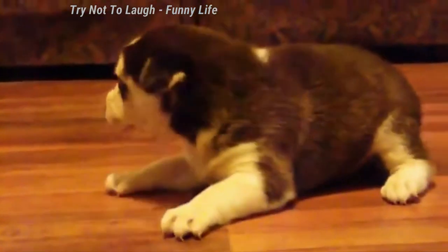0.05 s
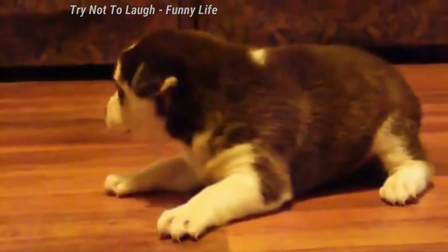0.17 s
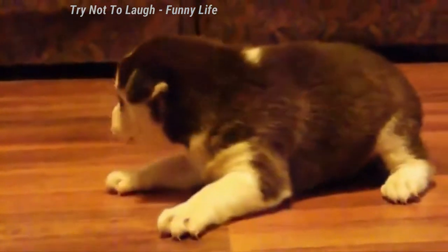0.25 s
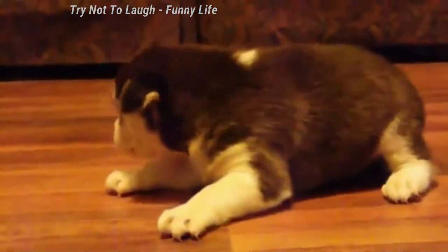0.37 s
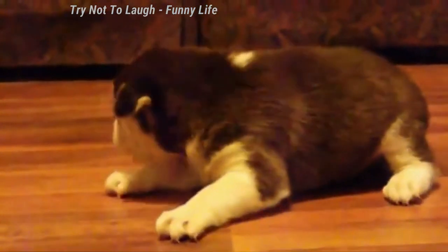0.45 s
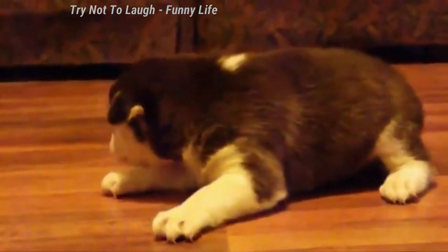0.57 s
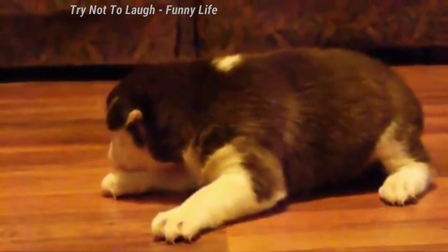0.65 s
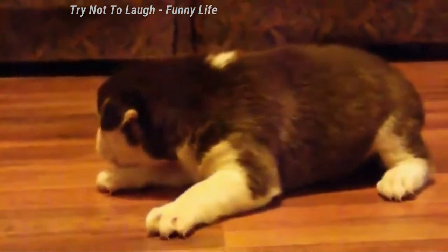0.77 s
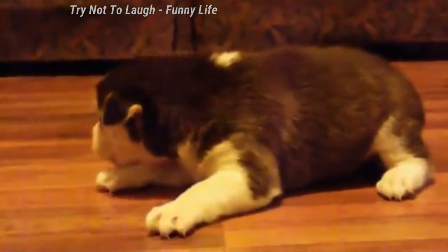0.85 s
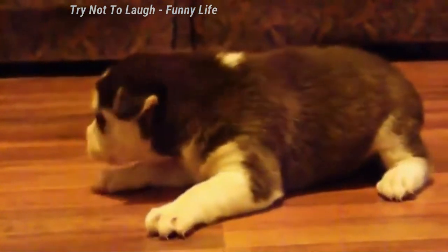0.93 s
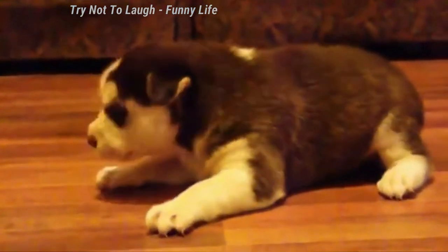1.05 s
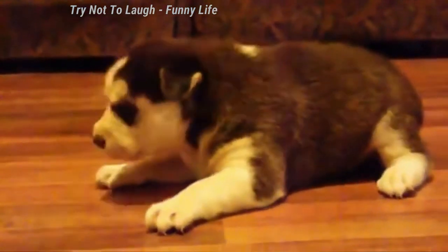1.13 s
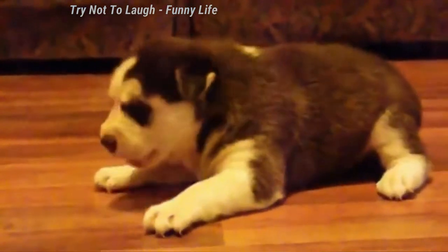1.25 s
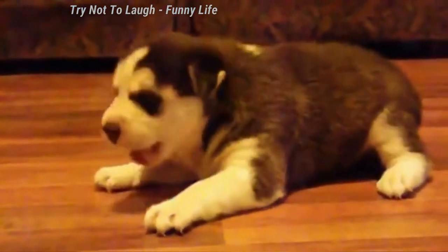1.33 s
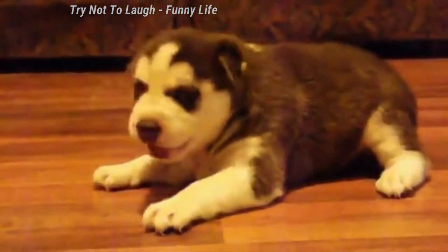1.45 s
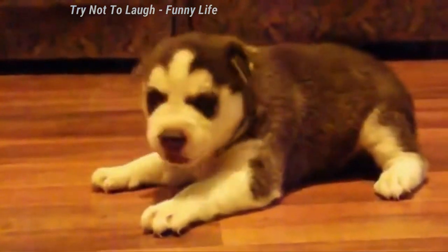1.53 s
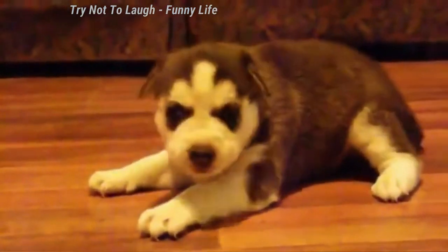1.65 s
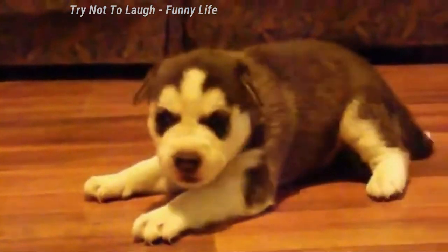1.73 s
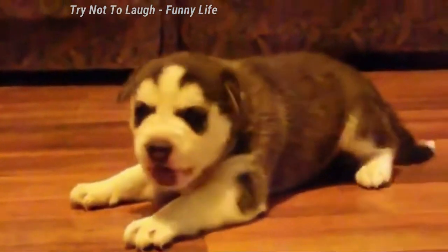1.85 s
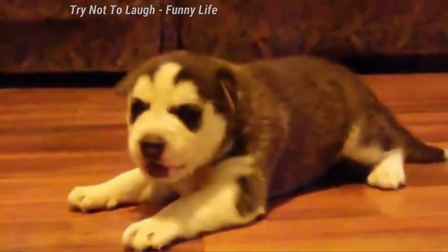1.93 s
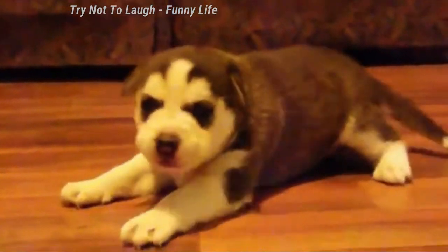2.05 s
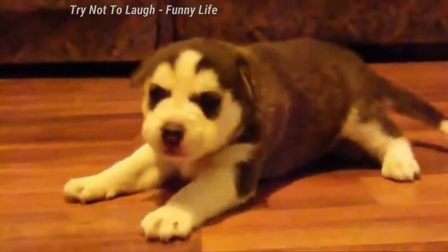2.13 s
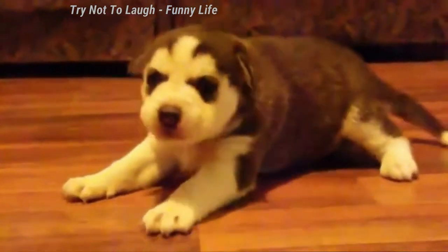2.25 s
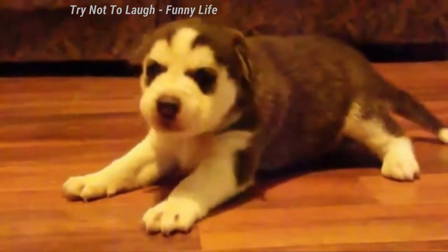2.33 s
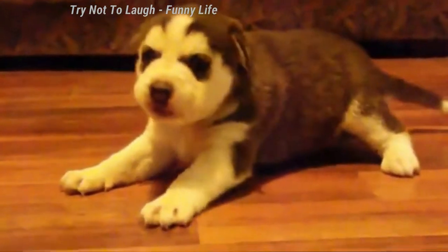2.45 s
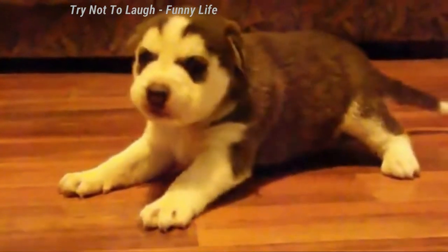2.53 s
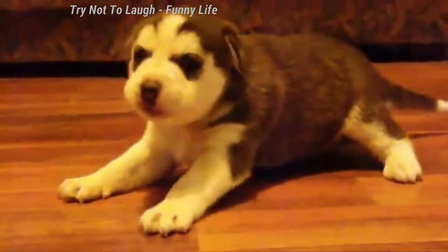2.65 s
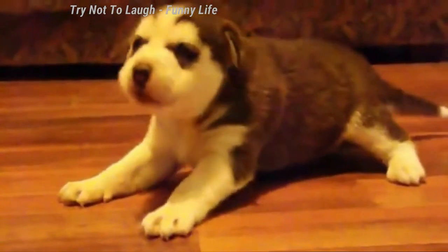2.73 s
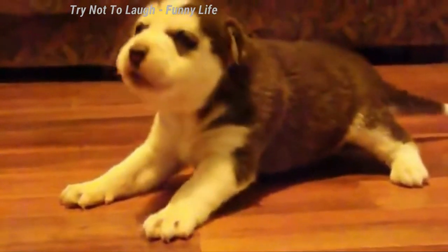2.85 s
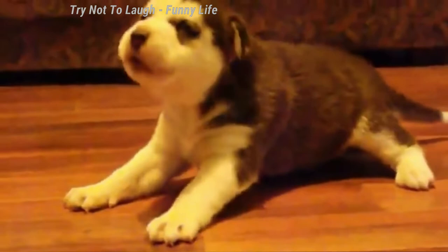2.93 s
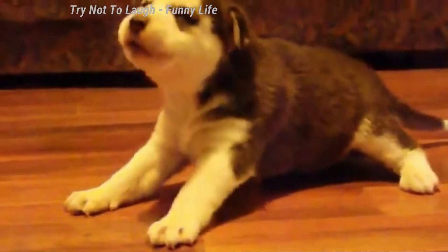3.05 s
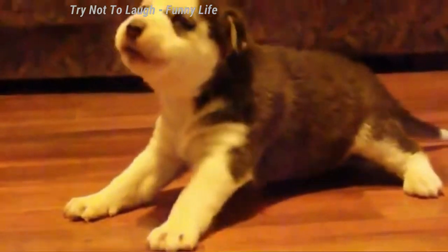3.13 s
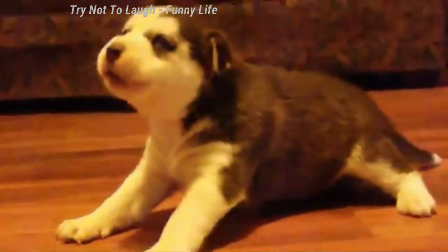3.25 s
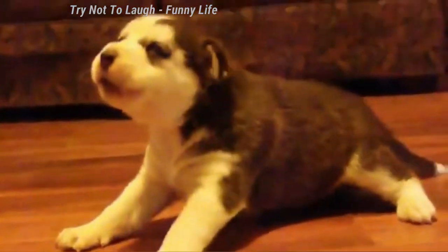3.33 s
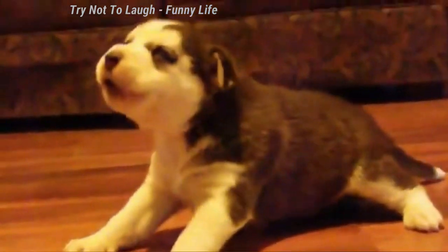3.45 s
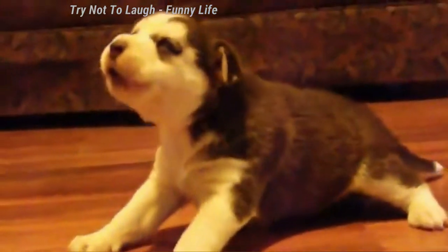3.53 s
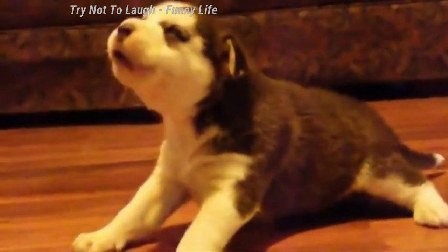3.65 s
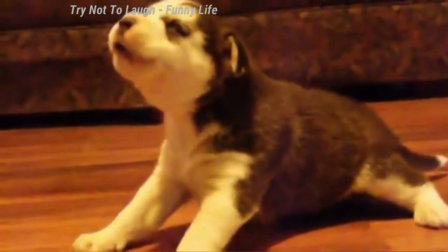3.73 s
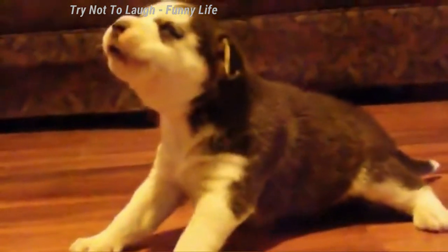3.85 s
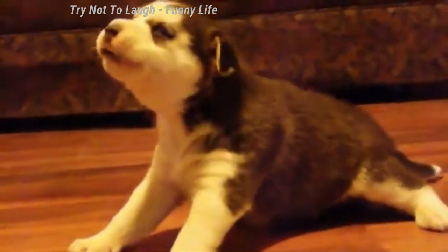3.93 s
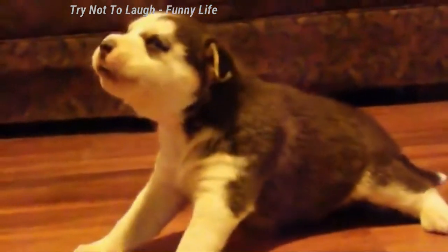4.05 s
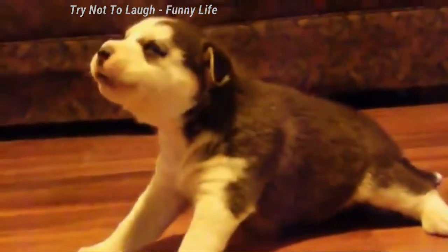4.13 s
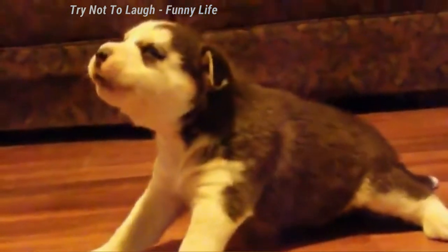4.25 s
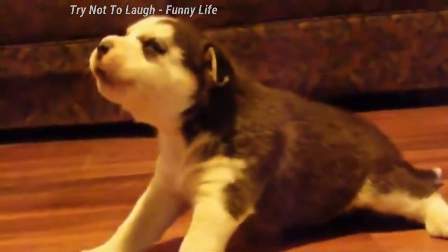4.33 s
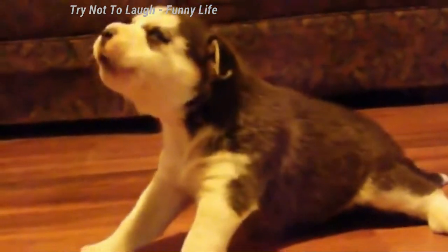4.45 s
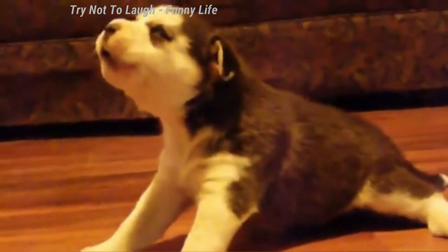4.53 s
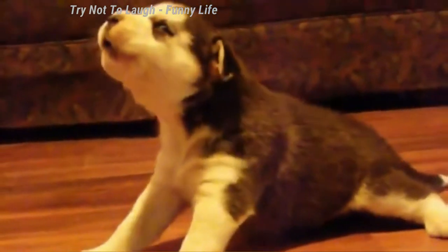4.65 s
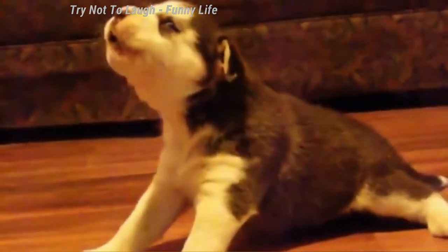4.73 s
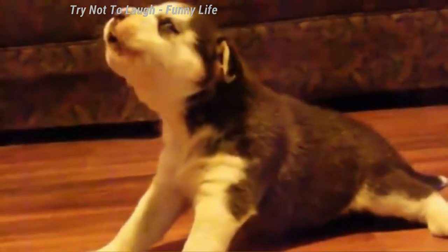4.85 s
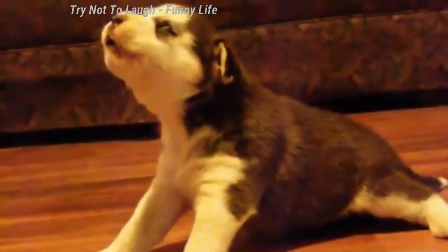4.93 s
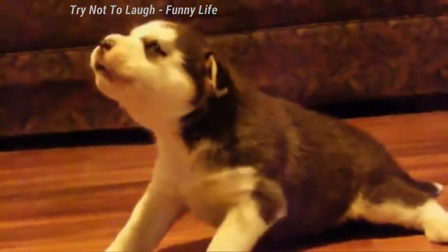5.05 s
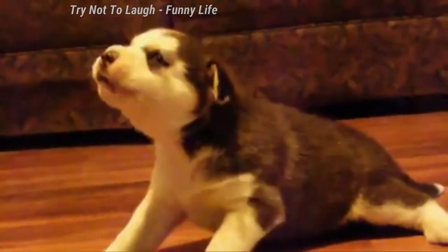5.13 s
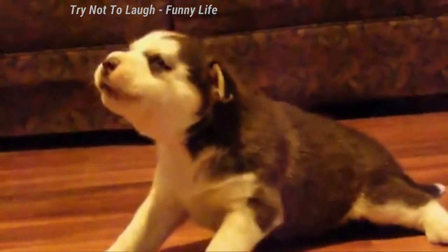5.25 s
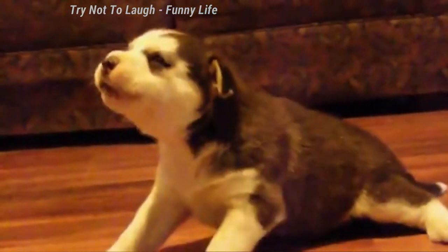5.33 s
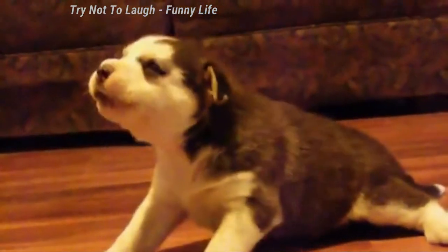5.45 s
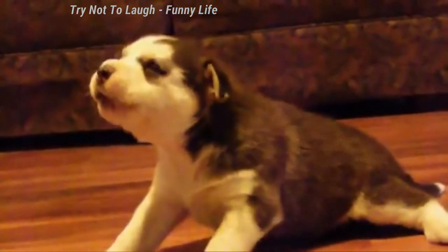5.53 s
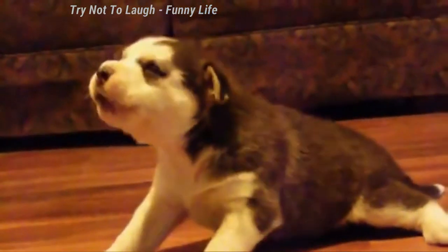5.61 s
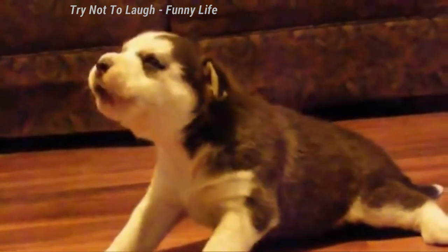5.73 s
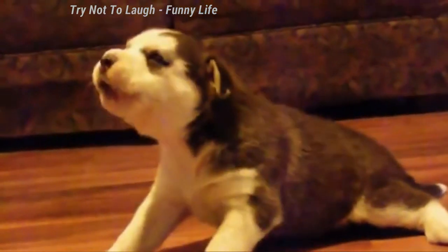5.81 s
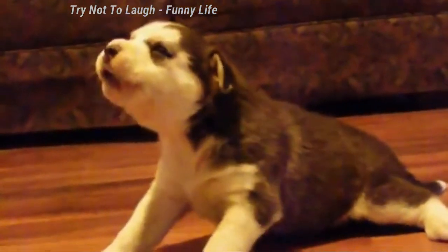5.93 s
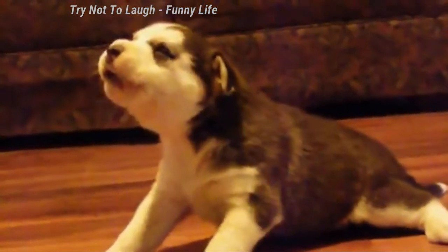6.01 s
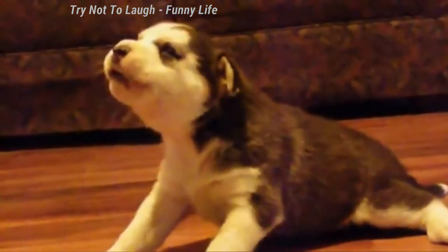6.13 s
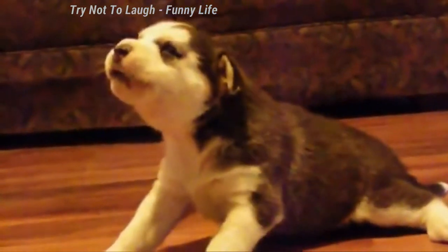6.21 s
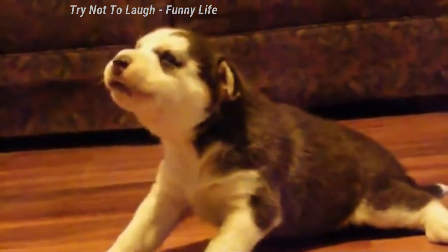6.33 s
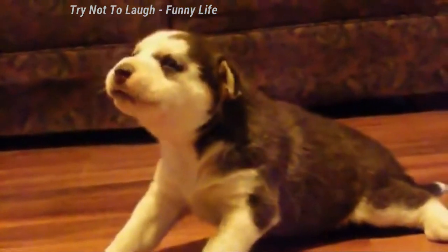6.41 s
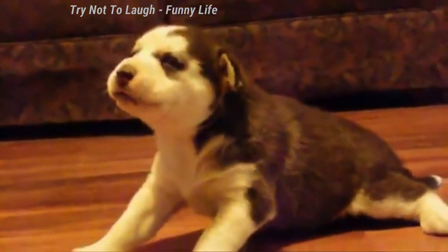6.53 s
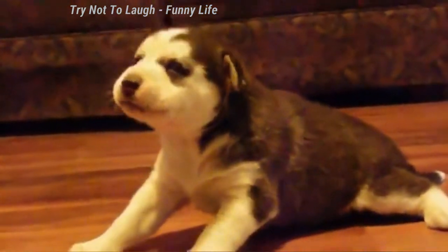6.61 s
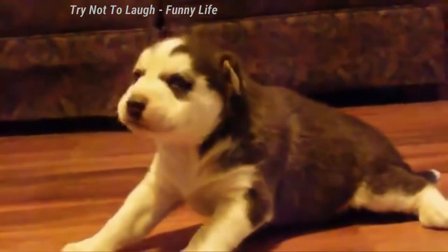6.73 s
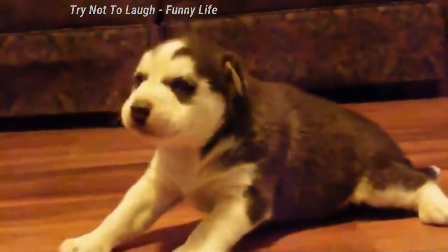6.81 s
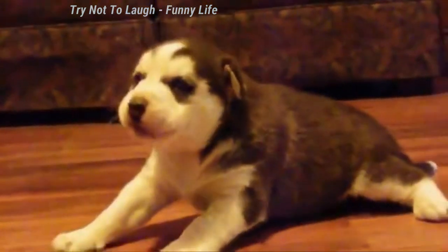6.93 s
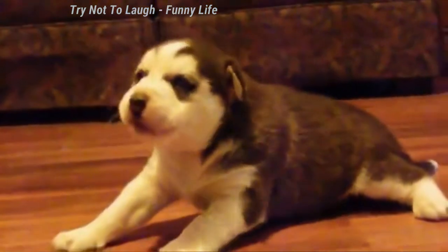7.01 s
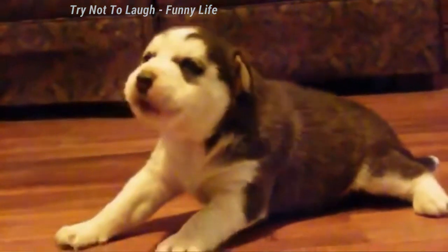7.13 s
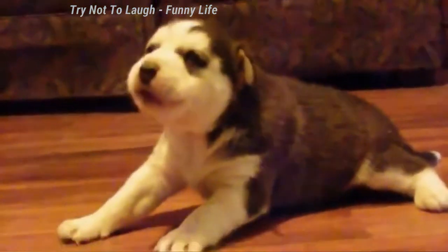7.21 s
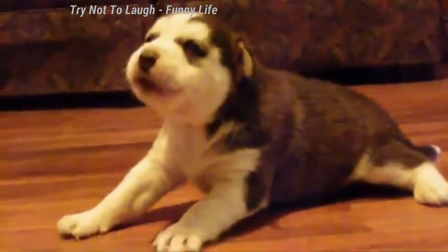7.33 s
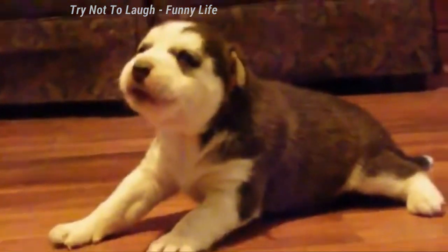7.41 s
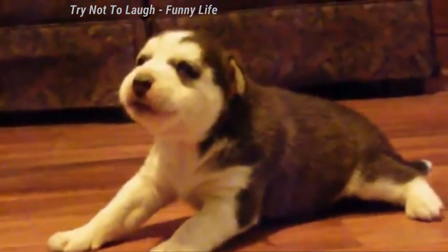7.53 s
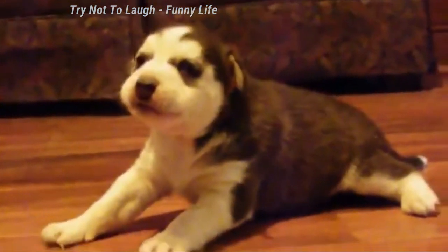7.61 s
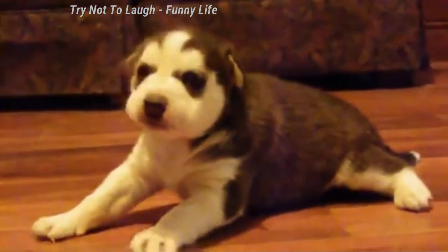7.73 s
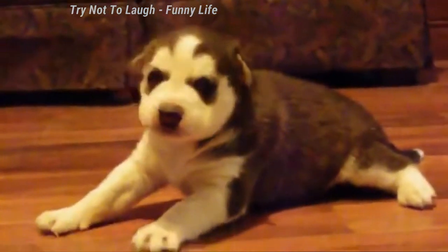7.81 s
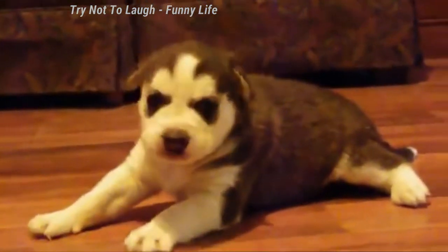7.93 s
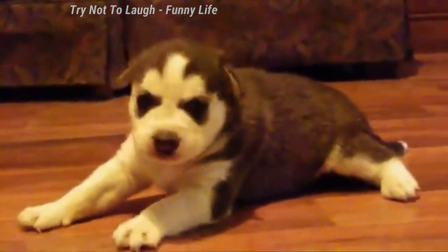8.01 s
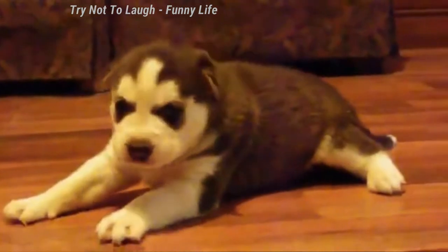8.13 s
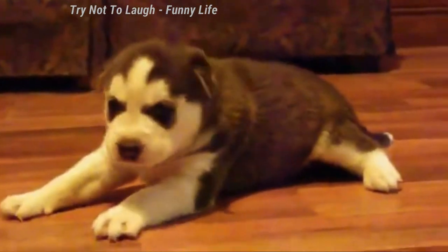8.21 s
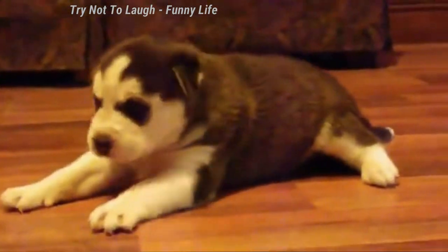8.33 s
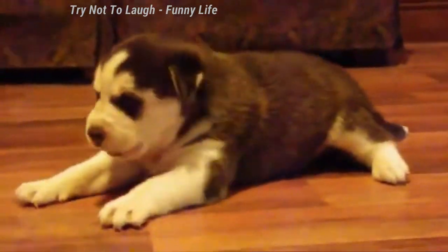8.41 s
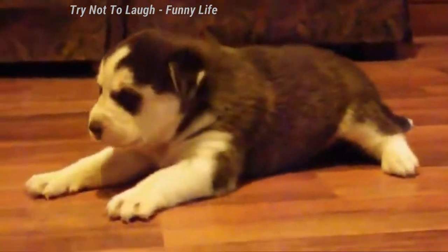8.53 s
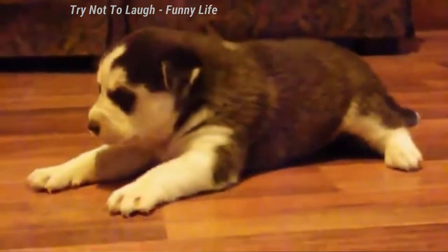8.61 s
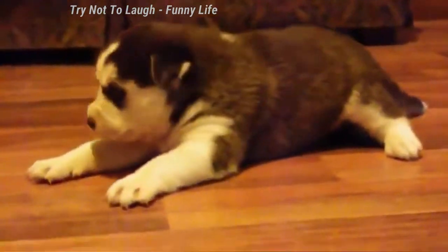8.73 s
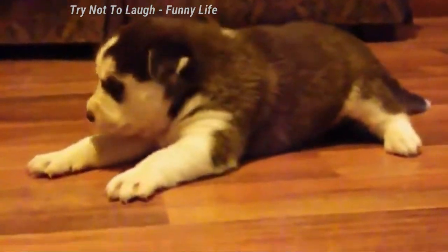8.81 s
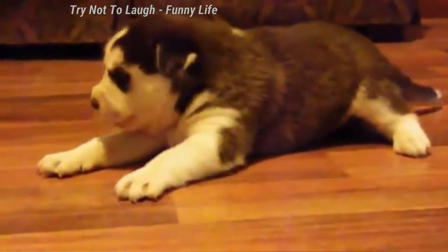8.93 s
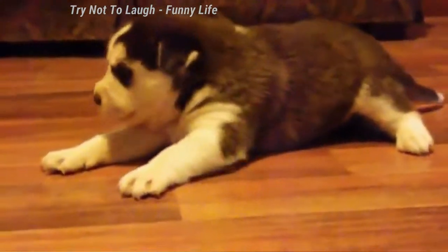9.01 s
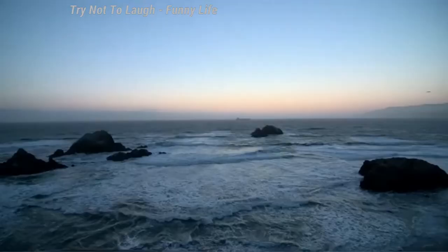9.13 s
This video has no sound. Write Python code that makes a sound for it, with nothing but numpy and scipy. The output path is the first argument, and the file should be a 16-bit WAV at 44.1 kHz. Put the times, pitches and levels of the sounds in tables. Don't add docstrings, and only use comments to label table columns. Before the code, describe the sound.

High-pitched puppy yips leap into wails and thin sustained howls with croaky starts and gasps, ending in short yips, indoors over soft hiss.

```python
import sys
import numpy as np
from scipy import signal
from scipy.fft import rfft, irfft, next_fast_len
from scipy.io import wavfile
from scipy.ndimage import uniform_filter1d, map_coordinates

SR = 44100
rng = np.random.default_rng(int(sys.argv[2]) if len(sys.argv) > 2 else 0)


def output_pcm(signal):
    pcm = np.clip(np.atleast_2d(signal).T, -1, 1) * 32767
    wavfile.write(sys.argv[1], SR, np.round(pcm).astype(np.int16))


def natural_amplitude(level_db):
    exponent = np.asarray(level_db, float) / 20
    return 10 ** exponent


N = 403955
END_S = 9.128

# frequency [Hz], level [dB].
HUM_TONES = [(120.1, -59), (180.2, -66), (240.2, -59), (300.3, -60), (473, -59)]
# frequency [Hz], density [dB per Hz].
HISS_SPECTRUM = [(18, -55), (40, -28), (100, -12.5), (270, -7.5), (470, -10.5), (1020, -8), (1510, -12.5),
                 (2070, -9), (2760, -13.5), (4660, -13.5), (11900, -26), (15500, -39)]
HISS_DB = -44
# frequency [Hz], time to fall by 60 dB [s].
ROOM_DECAY = [(400, 0.12), (750, 0.4), (1300, 0.41), (3500, 0.38), (8000, 0.29), (15000, 0.17)]
ROOM_DB = -7

# time [s], pitch [Hz], effort [dB], mouth opening [0-1],
# fold pressure on the overtones [dB].
YIP_CURVES = [
    [(0.0, 1268, -37, 0.72, -4), (.04, 1030, -36, 0.24, 7.5), (.07, 879.6, -29, 0, -1),
     (.178, 839, -21.5, 0.04, -7)],
    [(.42, 1072, -27.5, 0.98, -18), (.454, 1250, -18.5, 0.62, -13), (.47, 1413, -22, 0.56, 1.5),
     (.49, 1674, -17.5, 0.6, -10), (.516, 1655, -14, 1, -22.5), (.55, 1132, -28.5, 0.56, -1),
     (.567, 1015, -33, 0.2, 6)],
    [(.78, 1070, -26, 0.85, -19), (.818, 1218, -21.5, 0.49, -1.5), (.852, 1622, -28, 0.98, 11),
     (.9, 1610, -23, 1, -21), (.914, 1513, -21.5, 0.8, -13), (.93, 1235, -20.5, 0.6, -10),
     (.947, 1070, -25.5, 0.37, -5), (1.009, 1026, -26.5, 0.5, -9), (1.085, 998.4, -27, 0.13, -6)],
    [(1.305, 967, -26.5, 0.42, -2), (1.346, 1160, -19, 0.98, -1.5), (1.364, 1308, -22, 0.75, -2),
     (1.378, 1547, -23.5, 0.7, -4), (1.415, 1701, -21.5, 1.13, -12), (1.468, 1432, -26, 1.1, -7),
     (1.498, 1103, -32, 0.55, 2.5), (1.6, 1056, -27, 0.55, -1), (1.618, 998, -31.5, 0, 6.5)],
]
WAIL_CURVES = [
    [(1.814, 880, -24, 0.28, 2.5), (1.842, 1061, -23.5, 0.93, 5.5), (1.866, 1230, -22.5, 0.86, -9.5),
     (1.938, 1925, -24, 0.91, -5), (1.963, 1965, -23, 1, -9), (2.008, 1460, -24, 1.2, -18),
     (2.057, 1271, -23, .5, -18.5), (2.117, 1250, -24.5, 0.37, 3.5), (2.182, 1213, -29, 0.54, -16.5)],
    [(2.372, 870, -30.5, 0.092, -5.5), (2.408, 982, -24.5, 0.078, 4), (2.45, 1202, -24, 0.74, -7.5),
     (2.482, 1205, -24, 0.54, -5), (2.52, 1120, -31, 0.57, -5.5), (2.75, 1035, -32.5, 0.33, -8),
     (2.918, 1069, -24.5, 0.91, -24.5), (2.97, 1033, -29, 0.63, -11), (2.99, 974, -27, 0.15, -5)],
]
HOWL_CURVES = [
    [(3.183, 765, -27, .1, -26), (3.241, 887, -22, 0.094, -19.5), (3.315, 934, -31.5, 0.092, -13),
     (3.4, 949, -24.5, 0.3, -6), (3.47, 991.3, -22.5, 0.23, 0.5), (3.62, 1011, -25, 0.42, -3.5),
     (3.769, 1012, -24.5, 0.33, 0.5), (3.861, 918, -24.5, 0.06, -1)],
    [(4.47, 932, -24, 0.09, 5), (4.56, 1006, -26, 0.11, 4), (4.686, 1044, -26.5, 0.17, 6),
     (4.8, 1030, -24, 0.26, 1.5), (4.926, 1016, -21, 0.33, -5), (5.025, 956, -24.5, 0.35, -5)],
    [(5.66, 791, -13.5, 0, -10.5), (5.688, 988, -27.5, 0.15, 6.5), (5.73, 963, -26, 0.28, 1),
     (5.812, 984.4, -25.5, 0.37, 3), (5.987, 997, -24.5, 0.28, 5.5), (6.155, 962, -26, 0.53, 3),
     (6.249, 892, -23, 0.3, -2.5), (6.3, 782, -19, 0.2, -16.5)],
]
LAST_CURVES = [
    [(7.045, 1016, -41, .15, 6), (7.111, 966, -25.5, .15, -0.5), (7.167, 996.4, -32.5, 0.24, 6),
     (7.3, 988.5, -28.5, 0.32, 8), (7.403, 977.6, -27, 0.39, 2), (7.51, 941.3, -26, 0.34, 1.5),
     (7.591, 900, -28, 0.35, 0.5), (7.67, 786, -32, 0.047, -10.5)],
    [(7.97, 821, -22, .1, -18), (7.988, 850, -24.5, 0.16, -6), (8.012, 979, -28, 0.28, 4),
     (8.045, 1049, -35, 0.79, 3.5), (8.129, 879, -26.5, 0.085, -9.5), (8.172, 804, -21.5, 0.031, -22)],
    [(8.393, 902, -26.5, 0.31, -8), (8.431, 1140, -21, 0.84, -5.5), (8.449, 1208, -18, 0.54, -11.5),
     (8.464, 1367, -20, 0.71, -18), (8.488, 1415, -20, 1, -20), (8.51, 1380, -21.5, 0.97, -18),
     (8.553, 1094, -29.5, 0.28, -15), (8.6, 1035, -36, .1, -10), (8.659, 1011, -32, 0.12, -8.5)],
    [(8.9, 944, -27, 0.46, -9), (8.927, 1072, -21.5, 0.79, -12.5), (8.942, 1161, -17.5, 1, -5.5),
     (8.972, 1383, -18.5, 0.52, -11), (9.0, 1420, -22, 1, -19), (9.03, 1306, -28, 0.96, -9),
     (9.068, 1090, -34, 0.26, -10), (9.102, 1030, -39, 0.09, -10)],
]
# time [s], pitch [Hz], effort [dB],
# mouth opening [0-1], fold pressure on the overtones [dB].
EARLIER_YIP = [
    (-.16, 1103, -23, .9, -14),
    (-.1, 1500, -13.5, 1.1, -10),
    (-.04, 1520, -15.5, 1.17, -9),
    (0, 1284, -27.5, 0.77, -1.5),
]
# upper partials over the effort [dB], their lag at the start [dB],
# closing pitch [share], closing effort [dB], closing pressure [dB].
CALL_MANNER = [(-3, 18.5, .88, -14.5, -4), (-2.5, -48, .88, -3, 1.5), (-2, -36, .8, -3.5, -4),
               (1.5, -24, 0.75, -2, -10.5), (-1, -8.5, .72, -21, 4.5), (3, -3, .68, 2, -13),
               (-4.5, 6.5, 0.83, -2.5, -37), (-9, 2, .82, -5.5, -20), (-4.5, 2, .74, -18.5, 0),
               (1, -1, .92, -16, 8), (4.5, -16, .75, -12.5, 9), (-2, -15, 0.83, 2, -10),
               (-7, -39, 0.85, -1, -2)]
# from [Hz], to [Hz], lift [dB],
# level beyond its far edge [dB].
TONGUE_LIFTS = [(4480, 3100, 9, -2.5), (5000, 5000, 4, 8), (6000, 3800, 6, -2.5), (4350, 4100, 7, -2.5),
                (3850, 6900, 6, -0.5), (6000, 6000, 8, -4.5), (6250, 5200, 4.5, -4), (5580, 4800, 6.5, 0.5),
                (5700, 5000, 4, 5.5), (6900, 6800, 7, -5), (6600, 5000, -3, -9.5), (6540, 6400, 3, 5),
                (4000, 5600, 4.5, 2)]
TONGUE_WIDTH_HZ, FAR_EDGE_HZ = 570, 7800

# time [s], pitch rise [share], swell [dB], half length [s].
VOICE_CATCHES = [(.447, 0.01, 8, 0.0075), (.824, 0, 5, 0.0061), (0.9, 0.0071, 6.5, 0.0064),
                 (1.324, 0.01, 8, 0.0092), (1.35, 0.068, 3, 0.0019), (1.83, 0.013, 4, 0.016),
                 (1.628, 0.0026, 4.5, 0.0036), (2.697, 0.027, 4, 0.034), (5.742, 0.013, 4, 0.0046),
                 (5.785, 0.1, 1.5, 0.0052), (7.125, .045, 0, .012), (7.18, .045, 1.5, .014),
                 (7.228, .03, 0, .012), (7.281, .04, 0, .012), (8.436, 0.034, 8, 0.0044),
                 (8.941, 0.03, 5, 0.0047)]
# time [s], half length [s], spread of pitch [share].
FOLD_SHAKES = [(.03, .05, .02), (.51, .04, .03), (.88, .045, .015), (1.36, .014, .06), (1.42, .05, .016),
               (4.485, .025, .025), (5.675, .015, .03), (7.075, .02, .03), (8.52, .04, .006),
               (9.04, .04, .008)]
# time [s], held higher by [share], for [s],
# lands lower by [share], recovers in [s].
PITCH_BREAKS = [
    (4.512, 0.044, .025, .03, .02),
    (5.72, .075, .035, .05, .015),
    (5.793, 0.029, 0.0074, 0.031, 0.0068),
]
# time [s], half length [s],
# partials [dB], air [dB].
HOARSE_VEILS = [(0.044, 0.042, -0.5, -6), (.15, 0.054, -3.5, -14), (0.545, 0.019, -7, -1.5),
                (0.842, 0.011, 0, -31), (0.903, 0.037, -1, -15), (1.1, 0.0088, 1, -20),
                (1.358, 0.018, -8, -2.5), (1.43, 0.036, -5.5, -12), (1.56, 0.065, 4.5, -37),
                (1.629, 0.0065, 6, -16), (1.976, 0.04, -8.5, -24), (2.426, 0.01, 6, -31),
                (2.466, 0.014, -8.5, -28), (3.228, 0.043, 5, -30), (3.385, 0.021, -12, -21),
                (4.49, 0.03, -3, -15), (5.69, .027, -16, -19), (5.79, 0.0066, -13, -10),
                (6.283, .03, -2, -19), (7.067, 0.019, -15, -19), (7.64, 0.021, 1.5, -20),
                (8.014, 0.026, 1, -22.5), (8.1, 0.038, 7, -20), (8.445, 0.011, -13, -21),
                (8.572, 0.059, -5, -4), (8.655, 0.032, -5, -11), (8.948, 0.014, -13, -24),
                (9.068, 0.044, -4, 0)]
# time [s], half length [s],
# frequency [Hz], gain [dB].
PASSING_RINGS = [(.503, .02, 6750, 7.5), (.868, 0.022, 4900, 8), (1.33, .02, 4200, 9.5),
                 (1.325, .02, 3200, -5), (1.385, 0.021, 3150, 4), (1.57, 0.034, 4250, 5),
                 (1.628, 0.0088, 1800, 4.5), (1.631, 0.01, 3540, 17), (1.835, .025, 4000, 12),
                 (1.83, 0.022, 5200, -10), (1.903, 0.032, 3150, 11), (8.11, 0.035, 5000, 7),
                 (8.436, 0.0072, 3500, 4.5), (8.495, 0.032, 5600, 10.5), (8.485, .03, 4200, 5),
                 (8.995, 0.025, 5600, 9)]
RING_WIDTH_HZ = 470

# frequency [Hz], gain [dB].
MUZZLE_COLOUR = [(2500, -7), (3500, -10.5), (4100, -15.5), (5000, 2.5), (6000, -2.5), (7000, -1.5),
                 (9000, -17), (12000, -36.5), (15500, -49)]
MUZZLE_HZ, MUZZLE_WIDTH_HZ, MUZZLE_DB = 1341, 191, 8.6
MOUTH_SHUT_HZ, MOUTH_SPAN_HZ, MOUTH_WIDTH_HZ = 1570, 2076, 536
SECOND_DB, THIRD_DB = 6, 0
GAPE_HZ, GAPE_WIDTH_HZ, GAPE_DB = 4300, 300, 12.4
THIRD_HIGH_DB, CROAKING_DB = -5.5, -7
RISING_DB, FALLING_DB = 0.41, 0.34
STRAIN_HZ, STRAIN_SHAKE = 1250, .003
WAKE_S = 0.036
PRESS_SHARE = 0.36
CLOSE_S = .024
BREATH_DB = -24.5
AIR_TOP_HZ, AIR_TOP_DB = 7700, 6.1

# start [s], length [s], effort [dB], top fold beat [Hz], sag [share].
END_GRUNTS = [
    (.735, 0.11, -47, 404, 0.071),
    (2.255, 0.057, -39.5, 282, 0.31),
    (3.07, 0.042, -36.5, 178.4, 0.056),
    (7.655, 0.058, -41, 413, .02),
]
# start [s], length [s], effort [dB], top fold beat [Hz], sag [share].
HOWL_CROAKS = [
    (3.292, 0.055, -20, 483.5, 0.066),
    (3.352, 0.055, -21.5, 486.6, 0.044),
    (4.319, 0.18, -16.5, 501.4, .15),
    (5.498, .215, -17.5, 468.2, .08),
    (6.928, 0.18, -20.5, 525, .19),
]
# start [s], length [s], effort [dB], top fold beat [Hz], sag [share].
AIR_GASPS = [
    (4.05, .11, -27.5, 405.6, .2),
    (5.225, 0.11, -28.5, 413.6, 0.23),
    (6.505, .15, -31, 398.5, .4),
]
# second resonance from [Hz], to [Hz], from [dB], to [dB], top [dB].
CROAK_SHAPE, CROAK_THROAT = (0.7, 1.04, -5, -11), (1633, 1892, -7.5, 0.5, -20)
GRUNT_SHAPE, GRUNT_THROAT = (-0.1, 0.84, -3.5, -8), (1496, 1515, 4, -7, -19)
GASP_SHAPE, GASP_THROAT = (.5, .5, -8, -10), (1520, 1500, -19, -13, -17)
FOLD_SPREADS = [.14, .14, .095, .07, .04], [.01, .12, .12, .18], [.15, .085, .03]
# resonances moved by [Hz], chest tone [dB], rumble of air [dB].
RASP_TONES = ([(25, -3, -29), (30, -7, -31), (18, -9, -24.5), (13, -2.5, -25), (-250, -5, -24)],
              [(10, -1, -30), (10, 7.5, -8), (10, 5.5, -0.5), (10, -1, -16)], [(10, -2, -17.5),
              (10, -4, -19), (10, 2, -8)])
# time [s], half length [s], times the spread [ratio], swell [dB],
# open-mouth ring [dB].
CROAK_SPELLS = [(4.33, .014, 2.6, 1, -14), (4.36, .025, 1.8, 1, -16), (4.46, 0.029, .75, 0, -14),
                (5.53, .025, 1.7, -0.1, -10), (5.58, .02, 1.4, 0.5, -14), (6.972, .022, 2.2, -1, 2.5),
                (7.04, 0.013, 1.8, 1, -9), (7.063, 0.0081, 1.1, -10, -22), (7.082, 0.0093, 2.26, 3.5, -3)]
FIRST_BELOW_HZ, FIRST_WIDTH_HZ = 1073, 335
OPEN_RING_HZ, OPEN_RING_WIDTH_HZ = 1030, 1300

# time [s], peak [dB], frequency [Hz], width [Hz], decay [s].
THROAT_POPS = [
    (1.348, -26, 2400, 1200, 0.0045),
    (2.196, -20.5, 1820, 200, 0.0066),
    (5.229, -34, 1200, 1500, 0.0024),
    (6.955, -24.5, 2800, 1490, 0.0022),
    (8.432, -13, 3000, 1800, 0.0028),
    (8.936, -20, 3400, 1500, 0.0024),
]
# time [s], peak [dB], frequency [Hz], width [Hz].
CLAW_TICKS = [
    (2.255, -36.5, 6000, 5000),
    (2.2744, -37, 6000, 5000),
    (5.029, -27.5, 3200, 2500),
    (6.649, -24.5, 3000, 2460),
    (6.7475, -22, 3180, 900),
    (6.953, -25, 3500, 2500),
]
# time [s], level [dB].
PAW_SHUFFLE = [(6.1, -71), (6.25, -44), (6.45, -44.5), (6.7, -71), (7.8, -44.5), (8.05, -48.5), (8.2, -71),
               (8.35, -68)]
SQUEAK_START_S, SQUEAK_LENGTH_S, SQUEAK_DB, SQUEAK_HZ = 6.57, .066, -42, 3320

# time [s], drop [dB].
GAIN_DUCKS = [(-.05, -11.5), (.46, -14), (.835, -7.5), (1.345, -14.5), (1.843, -15), (2.1, -3.5),
              (2.47, -8.5), (4.33, -7.5), (5.5, -12.5), (8.444, -11.5), (8.946, -12)]
REST_DB, DUCK_S, RECOVER_S = -3, 0.036, 0.18
# frequency [Hz], width [Hz], gain [dB].
PORT_NOTCHES = [(5470, 110, 3), (7910, 515, -13.5), (8040, 160, -14), (10240, 590, -5.5)]


def evened(x):
    return x / np.sqrt(np.mean(x ** 2) + 1e-20)


def read(points, hz):
    f, value = np.transpose(points)
    return np.interp(np.log(hz + 1), np.log(f + 1), value)


def curve(points):
    return np.interp(np.arange(N) / SR, *np.transpose(points))


def columns(rows):
    s, *values = np.transpose(rows)
    t = np.arange(s[0], s[-1], 1 / SR)
    return [np.interp(t, s, v) for v in values]


def add(mix, s, sound):
    part = mix[round(s * SR):][:len(sound)]
    part += sound[:len(part)]


def within(table, t):
    return [row for row in table if t[0] - .1 < row[0] < t[-1] + .1]


def bell(x, centre, width):
    return np.exp(-((x - centre) / width) ** 2)


def bump(t, at, half):
    return np.exp(-((t - at) / half) ** 4)


def edges(length, rise_s, fall_s):
    t = np.arange(length) / SR
    return np.minimum(t / rise_s, 1) * np.minimum(t[::-1] / fall_s, 1)


def drifts(count, size):
    steps = rng.standard_normal((count, N // 50 + 1))
    return evened(uniform_filter1d(uniform_filter1d(steps, size), size))


def stretch(stream, s, length):
    at = (round(s * SR) + np.arange(length)) % N
    return map_coordinates(stream, [at * (len(stream) / N)], order=1, mode="nearest")


def colour(x, db):
    size = next_fast_len(len(x), True)
    gain = natural_amplitude(db(np.fft.rfftfreq(size, 1 / SR)))
    return irfft(rfft(x, size) * gain, size)[:len(x)]


def resonate(x, hz, width):
    turn = np.exp(2j * np.pi * np.cumsum(hz * np.ones(len(x))) / SR)
    r = np.exp(-np.pi * width / SR)
    return 2 * (turn * signal.lfilter([1 - r], [1, -r], x / turn)).real


def resonate_twice(x, hz, width):
    return resonate(resonate(x, hz, width), hz, width)


def background():
    t = np.arange(N) / SR
    hum = np.zeros(N)
    for hz, db in HUM_TONES:
        waver = evened(uniform_filter1d(rng.standard_normal(N), 4000))
        hum += natural_amplitude(db + 6.5 + .5 * waver) * np.sin(2 * np.pi * hz * t)
    hiss = colour(rng.standard_normal(N), lambda f: read(HISS_SPECTRUM, f))
    return hum + natural_amplitude(HISS_DB) * evened(hiss)


def room(x):
    taps = np.zeros(SR // 2)
    at = np.arange(160, len(taps) - 20, 20)
    taps[at + rng.integers(0, 20, len(at))] = rng.choice([-1., 1.], len(at))
    hz, t, z = signal.stft(taps, SR, nperseg=256)
    decay = natural_amplitude(-60 * t / read(ROOM_DECAY, hz)[:, None])
    tail = signal.istft(z * decay, SR, nperseg=256)[1]
    return signal.fftconvolve(x, tail / np.linalg.norm(tail))[:len(x)]


def fold_pitch(hz, t, closing, quiver, noise):
    s, length = t[0], len(t)
    hz = uniform_filter1d(hz, size=380, mode="nearest") * (1 + .0042 * stretch(quiver, s, length))
    strain = np.maximum(hz - STRAIN_HZ, 0) / 400
    hz = hz * (1 + STRAIN_SHAKE * strain * stretch(quiver[::-1], s, length))
    hz = hz * (1 + sum(rise * bell(t, at, half) for at, rise, db, half in within(VOICE_CATCHES, t)))
    flutter = evened(uniform_filter1d(stretch(noise, s + 3, length), size=70))
    spread = sum(share * bump(t, at, half) for at, half, share in within(FOLD_SHAKES, t))
    shaken = np.cumsum(hz * flutter * spread) / SR
    snap = 0
    for at, up, hold, down, back in within(PITCH_BREAKS, t):
        snap = snap + np.where(t < at, up * bump(t, at, hold), -down * np.exp(-abs(t - at) / back))
    return hz * (1 + snap) * (1 - 0.098 * closing), shaken


def call(rows, bright_db, wake_db, lift, quiver, tongue, noise):
    hz, effort_db, mouth, press_db = columns(rows)
    s, length = rows[0][0], len(hz)
    t = s + np.arange(length) / SR
    closing = bell(t, t[-1], 0.01386)
    hz, shaken = fold_pitch(hz, t, closing, quiver, noise)
    turns = np.cumsum(hz) / SR
    swell_db = sum(db * bell(t, at, half) for at, rise, db, half in within(VOICE_CATCHES, t)) + 3.6 * closing
    croaking = sum(np.exp(-((t - at - span / 2) / (span / 2 + .02)) ** 8) for at, span, *rest in HOWL_CROAKS)
    croaking_db = CROAKING_DB * np.minimum(croaking, 1)

    mouth_hz = MOUTH_SHUT_HZ + MOUTH_SPAN_HZ * mouth

    def mouth_gain_db(k):
        return -20 * np.log10(1 + ((k * hz - mouth_hz) / MOUTH_WIDTH_HZ) ** 2)

    first_db = effort_db + MUZZLE_DB / (1 + ((hz - MUZZLE_HZ) / MUZZLE_WIDTH_HZ) ** 2)
    second_db = effort_db + press_db + SECOND_DB + mouth_gain_db(2)
    third_db = effort_db + press_db + THIRD_DB + mouth_gain_db(3)

    upper_db = effort_db + PRESS_SHARE * press_db + bright_db + wake_db * np.exp(-(t - s) / WAKE_S)
    glide = np.gradient(np.log2(uniform_filter1d(hz, size=300))) * SR
    glide = np.clip(uniform_filter1d(glide, size=900, mode="nearest"), -20, 10)
    upper_db = upper_db + np.where(glide > 0, RISING_DB, FALLING_DB) * glide + croaking_db
    veils = within(HOARSE_VEILS, t)
    hoarse = natural_amplitude(upper_db) * sum(natural_amplitude(air_db) * bump(t, at, half) for at, half, db, air_db in veils)
    upper_db = upper_db + sum(db * bump(t, at, half) for at, half, db, air_db in veils)

    from_hz, to_hz, lift_db, far_db = lift
    lift_hz = np.linspace(from_hz, to_hz, length)

    def muzzle(f):
        lifted = lift_db * bell(f, lift_hz, TONGUE_WIDTH_HZ) + far_db * (f > FAR_EDGE_HZ)
        gape = GAPE_DB * np.clip(mouth, 0, 1) * bell(f, GAPE_HZ, GAPE_WIDTH_HZ)
        return read(MUZZLE_COLOUR, f) + lifted + gape

    def rung(f):
        return sum(db * bump(t, at, half) * bell(f, ring_hz, RING_WIDTH_HZ)
                   for at, half, ring_hz, db in within(PASSING_RINGS, t))

    high = natural_amplitude(upper_db + THIRD_HIGH_DB + muzzle(3 * hz)) * np.clip((3 * hz - 3600) / 600, 0, 1)
    third_db = 20 * np.log10(natural_amplitude(third_db + croaking_db / 2) + high)
    upper_db = upper_db + swell_db - 0.74 * np.maximum(hz - 1250, 0) / 100

    low, upper = np.zeros(length), np.zeros(length)
    for k, db in enumerate([first_db, second_db, third_db], 1):
        level = natural_amplitude(db + rung(k * hz) + 5 + np.sqrt(k) * swell_db)
        low += level * np.cos(2 * np.pi * k * (turns + min(k / 3, 1) * shaken))
    for k in range(4, 19):
        tongue_db = 0.38 * k * stretch(tongue[k], s, length)
        level = natural_amplitude(muzzle(k * hz) + rung(k * hz) + tongue_db) * (k * hz < 16000)
        upper += level * np.cos(2 * np.pi * k * (turns + shaken) + k * k / 2)

    air = stretch(noise, s, length) * (1 + np.cos(2 * np.pi * turns))
    air = colour(air, lambda f: read([(500, -19.0), (1500, 3.0)] + MUZZLE_COLOUR, f)
                 + AIR_TOP_DB * (f > AIR_TOP_HZ))
    voiced = -low + natural_amplitude(upper_db - 2.5) * upper + (natural_amplitude(first_db + BREATH_DB) + hoarse) * evened(air)
    return voiced * edges(length, 0.0029, 0.0037)


def rasp(start, length, effort_db, top_hz, sag, shape, throat):
    loud_at, top_at, start_db, end_db = shape
    from_hz, to_hz, from_db, to_db, top_db = throat
    u = np.linspace(0, 1, num=21)
    db = effort_db + np.interp(u, [0, loud_at, 1], [start_db, 0, end_db])
    hz = top_hz * (1 - sag * (abs(u - top_at) / max(top_at, 1 - top_at)) ** 1.4)
    second_hz = from_hz + (to_hz - from_hz) * u
    second_db = from_db + (to_db - from_db) * u
    return np.transpose([start + length * u, db, hz, second_hz, second_db, top_db + 0 * u])


def croak(rows, uneven, doubled_db, tone, gusts, noise):
    effort_db, hz, second_hz, second_db, top_db = columns(rows)
    s, length = rows[0][0], len(hz)
    t = s + np.arange(length) / SR
    moved_hz, chest_db, rumble_db = tone
    second_hz = second_hz + moved_hz * np.linspace(1, .05, length)

    uneven = uneven * np.linspace(.45, 2.0, length)
    spells = within(CROAK_SPELLS, t)
    uneven = uneven * (1 + sum((times - 1) * bump(t, at, half) for at, half, times, db, ring_db in spells))
    effort_db = effort_db + sum(db * bump(t, at, half) for at, half, times, db, ring_db in spells)
    opened = sum(natural_amplitude(ring_db) * bump(t, at, half) for at, half, times, db, ring_db in spells)

    slips = rng.standard_normal((400, 2))
    beat = (np.cumsum(hz) / SR).astype(int)
    turns = np.cumsum(hz * np.exp(uneven * slips[beat, 0])) / SR
    count = turns.astype(int)
    doubling_db = doubled_db * np.linspace(.3, 1.6, length) ** .5 * (-1) ** count
    pulses = np.diff(count, prepend=0) * natural_amplitude(10 * uneven * slips[count, 1] + doubling_db)
    pulses = signal.lfilter([1, -1], [1, -.98], pulses)

    first = resonate_twice(pulses, np.maximum(second_hz - FIRST_BELOW_HZ, hz), FIRST_WIDTH_HZ)
    second = resonate(resonate(pulses, second_hz, 380), second_hz, 410)
    third = resonate_twice(pulses, second_hz + 800, 670)
    chest = resonate_twice(pulses, hz, 260)
    open_ring = resonate_twice(pulses, OPEN_RING_HZ, OPEN_RING_WIDTH_HZ)
    throat = evened(first) + natural_amplitude(chest_db + np.linspace(.3, -16, length)) * evened(chest)
    throat = throat - natural_amplitude(second_db) * (evened(second) - natural_amplitude(-15.5) * evened(third))
    throat = throat + opened * evened(open_ring)
    throat = colour(throat, lambda f: read([(60, -7.0), (200, 1), (2600, 0.5), (3800, -27), (16000, -49)], f))

    puffs = signal.lfilter([1], [1, -.97], abs(pulses)) * stretch(noise, s, length)
    top = evened(colour(puffs, lambda f: read([(1500, -28.5)] + MUZZLE_COLOUR, f)))
    throat = throat + natural_amplitude(top_db) * top * natural_amplitude(3.9 * stretch(gusts, s, length))
    rumble = colour(stretch(noise, s + 2, length), lambda f: read(
        [(20, -28), (90, -17.5), (160, -5.5), (260, 3.5), (500, -29), (16000, -89)], f))
    throat = throat + natural_amplitude(rumble_db) * evened(rumble)
    effort_db = effort_db + 18 * uneven * stretch(gusts[::-1], s, length)
    return natural_amplitude(effort_db) * throat * edges(length, 0.007, 0.014)


def pops(noise):
    out, t = np.zeros(N), np.arange(1500) / SR
    for s, db, hz, width, decay in THROAT_POPS:
        puff = resonate_twice(np.gradient(stretch(noise, s + 1, len(t))), hz, width)
        add(out, s, natural_amplitude(db) * evened(puff) * np.minimum(t / .001, 1) * np.exp(-t / decay))
    return out


def ticks():
    out, t = np.zeros(N), np.arange(200) / SR
    for s, db, hz, width in CLAW_TICKS:
        add(out, s, natural_amplitude(db + 3.5) * resonate(rng.standard_normal(200), hz, width) * np.exp(-t / .0012))
    whistle = resonate_twice(rng.standard_normal(3000), SQUEAK_HZ, 150)[:round(SQUEAK_LENGTH_S * SR)]
    add(out, SQUEAK_START_S, natural_amplitude(SQUEAK_DB) * evened(whistle) * np.hanning(len(whistle)))
    brush = colour(rng.standard_normal(N), lambda f: read(
        [(1000, -31), (2500, -6), (5000, -5.5), (9000, -18), (12000, -21.5), (16000, -29.0)], f))
    return out + natural_amplitude(curve(PAW_SHUFFLE)) * evened(brush)


def automatic_gain_db():
    t = np.arange(N) / SR
    gain_db = np.full(N, float(REST_DB))
    for s, db in GAIN_DUCKS:
        gain_db += db * np.clip((t - s) / DUCK_S, 0, 1) * np.exp(-np.maximum(t - s - DUCK_S, 0) / RECOVER_S)
    return gain_db


def scene():
    puppy = ticks()
    quiver, gusts = drifts(count=2, size=8)
    tongue, noise = drifts(count=19, size=60), rng.standard_normal(N)
    calls = YIP_CURVES + WAIL_CURVES + HOWL_CURVES + LAST_CURVES
    for rows, manner, lift in zip(calls, CALL_MANNER, TONGUE_LIFTS):
        bright_db, wake_db, share, close_db, slack_db = manner
        s, hz, db, mouth, press_db = rows[-1]
        closed = rows + [(s + CLOSE_S, hz * share, db + close_db, mouth, press_db + slack_db)]
        add(puppy, rows[0][0], call(closed, bright_db, wake_db, lift, quiver, tongue, noise))
    kinds = [(HOWL_CROAKS, CROAK_SHAPE, CROAK_THROAT), (END_GRUNTS, GRUNT_SHAPE, GRUNT_THROAT),
             (AIR_GASPS, GASP_SHAPE, GASP_THROAT)]
    doublings_db = 4, 2, 1
    for kind, spreads, doubled_db, tones in zip(kinds, FOLD_SPREADS, doublings_db, RASP_TONES):
        table, shape, throat = kind
        for row, uneven, tone in zip(table, spreads, tones):
            add(puppy, row[0], croak(rasp(*row, shape, throat), uneven, doubled_db, tone, gusts, noise))
    puppy = (puppy + pops(noise)) / natural_amplitude(automatic_gain_db() + 0.5)
    earlier = call(EARLIER_YIP, 8.7, 0, TONGUE_LIFTS[0], quiver, tongue, noise)
    earlier = earlier * natural_amplitude(9.5)
    ring = room(np.concatenate([earlier, puppy]))[-N:]
    return (puppy + natural_amplitude(ROOM_DB) * ring + background())[None]


def low_pass(x):
    return signal.sosfilt(signal.butter(12, 15670, fs=SR, output="sos"), x)


def record(dry):
    port = colour(dry[0], lambda f: sum(db * bell(f, hz, width) for hz, width, db in PORT_NOTCHES))
    loud = port * natural_amplitude(automatic_gain_db())
    excess = loud - np.clip(loud, -.9, .9)
    shaved = colour(excess, lambda f: read([(150, -25), (600, 0), (8000, 0), (14000, -25)], f))
    held = loud - shaved
    held = held * np.clip((END_S - np.arange(N) / SR) / 0.0025, 0, 1)
    return low_pass(held[None])


dry = scene()
out = record(dry)
output_pcm(out)
```